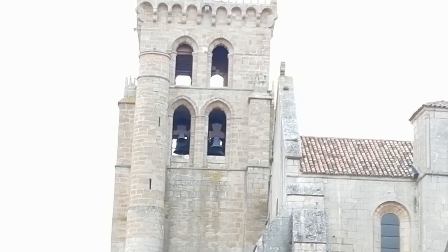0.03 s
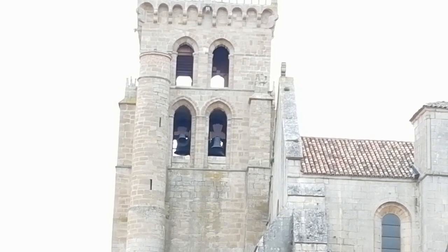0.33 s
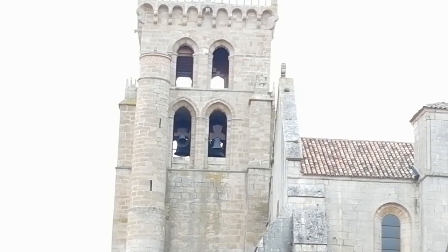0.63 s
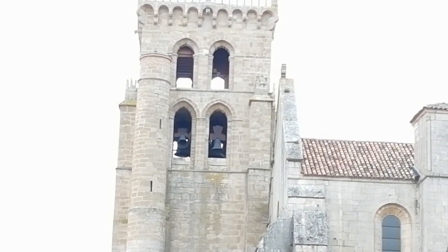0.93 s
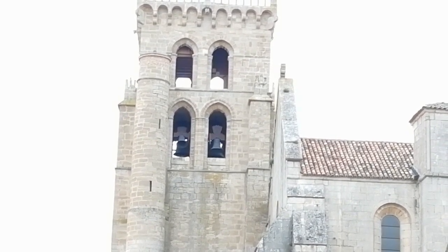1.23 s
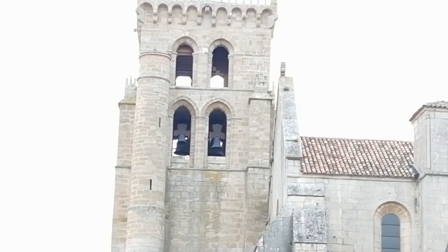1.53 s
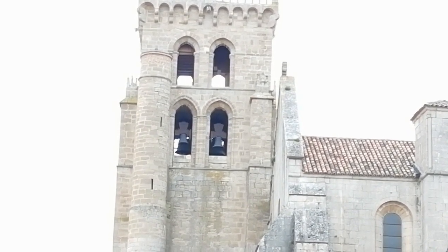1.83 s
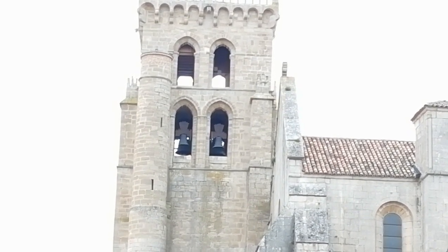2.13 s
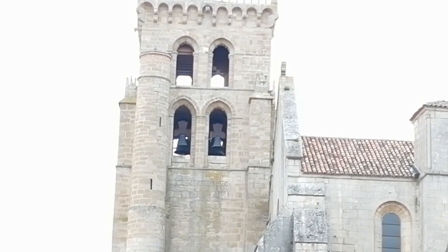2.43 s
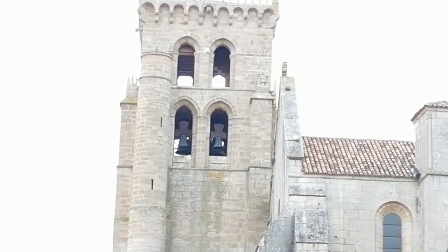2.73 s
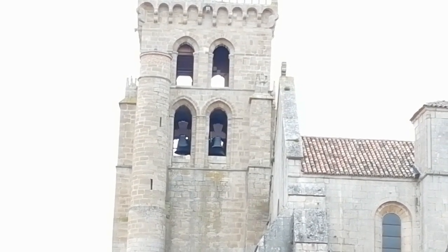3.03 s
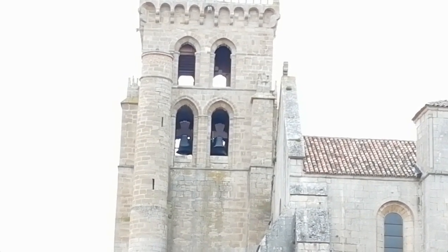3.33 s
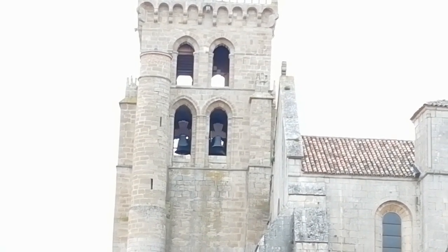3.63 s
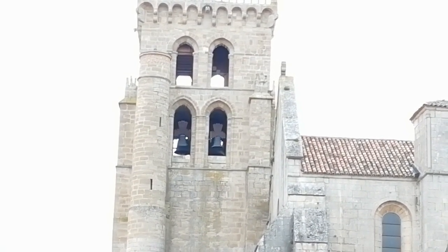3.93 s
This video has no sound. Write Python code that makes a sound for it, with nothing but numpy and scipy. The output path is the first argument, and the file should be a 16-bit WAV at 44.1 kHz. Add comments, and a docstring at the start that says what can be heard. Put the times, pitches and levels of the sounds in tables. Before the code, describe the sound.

A church bell clangs hard right at the start and again at 0.5 seconds, echoing off courtyard walls. Its metallic tones pulse and swell, fading by about 3 seconds. A small bird chirps at 2.5 seconds, with fainter chirps and thin whistles after 3. Wind rumbles on the microphone from about 2.9 seconds to the end. A soft, duller bell stroke comes at 3.8 seconds, over faint outdoor hiss.

```python
"""In a court below a stone tower, a swinging church bell rings: two hard blows, a pause, a soft one.
Each blow of the clapper makes a short clang and many ringing tones, which pulse and swell as the
bell's mouth turns. The walls throw each blow back twice. Small birds chirp and whistle, a gust of
wind rumbles on the microphone, and one tiny tick sounds over a faint outdoor hiss."""
import sys
import numpy as np
from scipy import signal
from scipy.fft import rfft, irfft
from scipy.io import wavfile

SR = 44100
rng = np.random.default_rng(int(sys.argv[2]) if len(sys.argv) > 2 else 0)


def store_wav(level_fs):
    """Save 16-bit WAV to argv[1]."""
    pcm = np.round(np.clip(np.atleast_2d(level_fs), -1, 1) * 32767)
    wavfile.write(sys.argv[1], SR, pcm.T.astype(np.int16))


N = 176400

# Clapper blows. Each row: start in seconds, spot struck on the lip (0, 1 or 2), clang gain in dB,
# clang treble cut-off in Hz, extra gain of the clang's echoes in dB.
BLOWS = [(-.02, 0, -29.5, 11000, -7), (.489, 1, -30.5, 8000, 0), (3.766, 2, -46, 2200, -7)]
# Wall echoes. Each row: delay in seconds, gain for the ring in dB, gain for the clang in dB.
WALL_ECHOES = [(.19, 0, -4), (.375, -7, -10)]
# The tone colour of iron hitting bronze. Each row: frequency in Hz, relative level in dB.
CLANG_COLOUR = [(300, -20), (600, -12), (1000, -2), (1600, 0), (2300, -2.5), (3000, -6.5), (4300, -13),
                (5500, -25), (8000, -29), (11000, -42)]


def bell_ring(t):
    """Each blow rings close pairs of tones that beat (pulse); the swing and the walls make them swell."""
    # The bell's tones. Each row: pitch in Hz, seconds to fade by 60 dB, beat rate in Hz, beat depth
    # from 0 to 1, left minus right in dB, then relative levels in dB when struck at spots 0, 1 and 2.
    tones = [(241.6, 11.0, 0.38, 0.75, 0, -64, -70, -82), (393.8, 6.0, 1.18, 0.55, -2, -45.5, -64, -62),
             (559.0, 11.0, 0.38, 0.35, -5, -51, -61, -68), (638.9, 4.5, 0.38, 0.75, -5, -44, -48, -57),
             (946.6, 4.5, 1.42, 0.35, 0, -52, -61, -61), (1007.7, 3.6, 1.58, 0.15, -1, -48, -52, -63),
             (1088.6, 3.0, 0.54, 0.35, -6, -42, -34, -44), (1152.2, 3.0, 2.06, 0.35, -3, -48, -50, -54),
             (1227.1, 3.0, 0.94, 0.55, -6, -40, -52, -57), (1422.9, 2.1, 4.46, 0.15, 0, -48, -48, -58),
             (1595.0, 1.8, 1.26, 0.35, -5.5, -46, -38, -49), (1624.6, 2.1, 0.94, 0.35, 0, -26, -24, -48),
             (1665.2, 2.3, 1.18, 0.15, -1, -28, -30.5, -44), (1943.5, 1.5, 1.02, 0.55, -1, -40, -43, -56.5),
             (2093.5, 1.2, 2.86, 0.15, 1, -43, -37, -62), (2209.2, 1.8, 1.74, 0.15, 7, -43, -38.5, -62),
             (2289, 2.1, 1.18, 0.75, -2.5, -29.5, -38.5, -41.5), (2311, 1.8, 4.46, 0.15, -2, -42, -42, -65),
             (2595.4, 1.2, 1.5, 0.3, -3, -48, -41, -68), (2637.0, 1.5, 0.3, 0.15, -5, -49, -43, -72),
             (2787.7, 1.1, 3.98, 0.15, -4, -33.5, -37.5, -57), (2871.1, 1.3, 0.86, 0.35, -8, -44, -43, -63),
             (2987, 1.8, 1.02, 0.35, -7, -38, -40.5, -53), (3241.3, 1.2, 1.18, 0.75, -16, -37.5, -45, -76),
             (3544.4, 1.8, 1.26, 0.75, -14, -46, -59, -85), (3729.6, 2.0, 1.34, 0.55, -12, -40, -49.5, -63),
             (3939, 1.4, 4.46, 0.15, -16, -44, -45, -69), (4529.4, 1.7, 3.9, 0.35, -9, -48.5, -56, -67)]
    # How much the mouth faces the listener. Each row: time in seconds, gain for high tones in dB.
    facing = [(0, -1), (.13, 2), (.22, 0), (.43, -3.5), (.52, 0), (.9, 1), (1.3, 3.5), (1.7, -3), (2.3, -8),
              (3.8, -3)]
    # Tones that swell and dip on their own, listed by pitch in Hz. Each row: time in seconds, gain in dB.
    swells = {394: [(.1, 0), (.4, 3), (.9, 0), (1.05, -11), (1.24, -9), (1.4, 0)], 639: [(.05, -8),
              (.24, 0), (.62, -3), (.75, 6), (1, 2), (1.17, -6), (1.35, 2), (1.55, -6), (1.9, 5), (3.2, 0)],
              1089: [(.2, 0), (.45, 8), (.51, -4), (.66, 5), (.73, -9), (.8, -3), (.95, -4), (1.09, 4),
              (1.2, -10), (1.3, 5), (1.43, -7), (1.6, 0)], 1625: [(.3, 0), (.52, -2), (.96, 3), (1.08, -3),
              (1.2, 0)], 2289: [(.08, 0), (.25, -1), (.6, 2), (.72, -4), (.87, 6), (1.05, -4), (1.35, 1)]}
    # How far the two ears are out of step. Each row: pitch in Hz, phase gap in radians.
    ear_gaps = [(240, .6), (394, 1.7), (560, 2.35), (640, 1.6), (1100, .8), (1650, .4), (2300, 1.7),
                (4000, 2.0)]
    bell_db, echo_share, beam_hz = -.7, .3, 1600
    late_scatter, fresh_scatter, scatter_s = .21, .38, .35
    out = np.zeros((2, N))
    slow_t = np.linspace(0, t[-1], 4000)  # coarse time steps for the loudness changes
    facing_db = curve(slow_t, facing)
    fresh = sum((slow_t > start) * np.exp(-np.abs(slow_t - start) / scatter_s) for start, *_ in BLOWS)
    for hz, t60, beat_hz, beat_depth, pan_db, *spot_db in tones:
        power = 0
        for start, spot, *_ in BLOWS:
            age = slow_t - start
            echoes = sum(undb(db) * fade(age - delay, t60, rise=.02) for delay, db, _ in WALL_ECHOES)
            ring = fade(age, t60, rise=.008) + echo_share * echoes
            beating = np.abs(1 + beat_depth * np.exp(2j * np.pi * beat_hz * age))
            power += (undb(spot_db[int(spot)]) * ring * beating) ** 2
        swell_db = sum(curve(slow_t, points) for near_hz, points in swells.items() if abs(near_hz - hz) < 20)
        beam = min(hz / beam_hz, 1)  # low tones spread all round, high ones follow the mouth
        loudness = np.sqrt(2 * power) * undb(bell_db + swell_db + facing_db * beam) * stereo(pan_db)
        # Reflections inside the tower roughen each tone, most of all just after a blow.
        scatter = (late_scatter + fresh_scatter * fresh) * np.sqrt(beam)
        half_gap = curve(hz, ear_gaps) * rng.choice([-1, 1]) / 2
        tone = np.exp(2j * np.pi * (hz * t + rng.random()))
        for ear, side in enumerate((1, -1)):
            direct = np.exp(1j * side * half_gap)
            scattered = scatter * wander(slow_t, hz=9)
            envelope = loudness[ear] * (direct + scattered) / np.sqrt(1 + scatter ** 2)
            out[ear] += (np.interp(t, slow_t, envelope) * tone).real
    return out


def clapper_clang(t):
    """Iron cracks against bronze, leaving a short tail in the tower and a shimmer of high tones."""
    shimmer = undb(-7.5) * stereo(pan_db=-6) * high_tones()
    out = np.zeros((2, N))
    for start, _, db, cutoff_hz, walls_db in BLOWS:
        age = t - start
        crack = undb(-1.5) * echoing_fade(age, walls_db, t60=.25)
        tail = undb(-12.5) * echoing_fade(age, walls_db, t60=1.35)
        hit = np.hypot(crack, tail) * wide_noise(CLANG_COLOUR, side_db=0) * stereo(pan_db=-2)
        ringing = shimmer * echoing_fade(age, walls_db, t60=1.45)
        treble_cut = signal.butter(2, cutoff_hz, fs=SR, output="sos")
        out += undb(db) * signal.sosfilt(treble_cut, hit + ringing)
    return out


def high_tones():
    """The bell's many weak high tones: narrow, wavering peaks in noise."""
    count, low_hz, high_hz, width_hz, db_per_octave = 70, 2100, 9500, 2.5, 5.5
    freqs = np.fft.rfftfreq(N, 1 / SR)
    peaks = 0
    for k, (place, size) in enumerate(rng.random((count, 2))):
        hz = low_hz * (high_hz / low_hz) ** ((k + place) / count)
        height = undb(10 * size + db_per_octave * np.log2(hz / low_hz))
        peaks += height / (1 + ((freqs - hz) / width_hz) ** 2)
    return np.array([noise(CLANG_COLOUR, peaks) for _ in range(2)])


def echoing_fade(age, walls_db, t60):
    """The loudness of a clang over time: it arrives directly, then twice more off the walls."""
    power = fade(age, t60, rise=.006) ** 2
    for delay, _, db in WALL_ECHOES:
        power += (undb(db + walls_db) * fade(age - delay, t60, rise=.02)) ** 2
    return np.sqrt(power)


def wind(t):
    """Swirls of air rumble on the microphone; a stronger gust reaches higher in pitch."""
    # The wind's strength. Each row: time in seconds, level in dB before the flutter is added.
    gust = [(0, -54), (.07, -45), (.16, -59), (.45, -52), (.65, -45), (1.08, -56), (1.5, -55.5),
            (1.95, -63.5), (2.16, -51), (2.6, -52.5), (2.76, -46.5), (2.9, -36.5), (3.07, -31.5),
            (3.14, -35.5), (3.22, -31.5), (3.28, -37.5), (3.6, -35), (3.68, -41), (3.77, -31.5), (4, -31.5)]
    # The tone colours of light and strong wind. Each row: frequency in Hz, relative level in dB.
    light_colour = [(15, -2), (40, 1.5), (80, -0.5), (130, -11.5), (220, -25), (400, -34.5), (800, -60.5)]
    strong_colour = [(15, -9), (40, -4), (80, 0), (140, -1), (220, -8.5), (300, -16.5), (420, -29),
                     (600, -57.5), (1200, -71)]
    light_db, strong_db, flutter_db, lag_s = -54.5, -37, 3.5, .0009
    db = curve(t, gust)
    strength = np.clip((db - light_db) / (strong_db - light_db), 0, 1)
    light = np.sqrt(1 - strength) * wide_noise(light_colour, side_db=-18)
    strong = np.sqrt(strength) * wide_noise(strong_colour, side_db=-18)
    left, right = (light + strong) * undb(db + flutter_db * wander(t, hz=10).real)
    return np.array([left, np.interp(t - lag_s, t, right)])  # the swirls reach the left ear first


def bird_chirps(t):
    """One bird on the right gives quick falling chirps that echo briefly in the court."""
    # Each row: start in seconds, relative level in dB.
    chirps = [(2.503, -50), (3.174, -67), (3.243, -65), (3.313, -63), (3.387, -65), (3.469, -64),
              (3.565, -67)]
    from_hz, to_hz, length_s, echo_db = 4250, 2950, .03, -9
    out = np.zeros((2, N))
    for start, db in chirps:
        progress = np.clip((t - start) / length_s, 0, 1)
        hz = from_hz * (to_hz / from_hz) ** progress * (1 + .015 * wander(t, hz=150).real)
        tone = np.sin(2 * np.pi * np.cumsum(hz) / SR)
        out += undb(db) * stereo(pan_db=-9) * np.sin(np.pi * progress) * tone
    court = rng.standard_normal((2, N)) * fade(t, t60=.4, rise=.02)
    echo = signal.fftconvolve(out, court / np.linalg.norm(court[0]), axes=1)[:, :N]
    return out + undb(echo_db) * echo


def bird_whistles(t):
    """Far birds give thin, slightly rising whistles that flicker in each ear."""
    # Each row: start in seconds, length in seconds, pitch it rises to in Hz, relative level in dB.
    whistles = [(1.61, .15, 5370, -65), (3.48, .12, 7720, -63), (3.69, .21, 6120, -63)]
    rise, waver = .04, .006  # shares of the pitch
    out = np.zeros((2, N))
    for start, length, pitch_hz, db in whistles:
        progress = np.clip((t - start) / length, 0, 1)
        hz = pitch_hz * (1 - rise * (1 - progress) ** 4 + waver * wander(t, hz=40).real)
        tone = undb(db) * np.sin(np.pi * progress) * np.exp(2j * np.pi * np.cumsum(hz) / SR)
        out += np.array([(tone * wander(t, hz=25)).real for _ in range(2)])
    return out


def tick(t):
    """One tiny burst of high noise, close by."""
    start_s, hz = 2.856, 9500
    colour = [(hz / 2, -20), (hz, 0), (hz * 1.5, -18)]
    return undb(-54) * fade(t - start_s, t60=.015, rise=.0005) * wide_noise(colour, side_db=-5)


def outdoor_hiss():
    """A faint, steady hiss from all around."""
    # Each row: frequency in Hz, relative level in dB.
    colour = [(100, 7.5), (400, -1), (3000, -3.5), (5500, -7), (8300, -5), (10500, -15.5), (15500, -19.5)]
    return undb(-64.5) * wide_noise(colour, side_db=0)


def undb(db):
    """Turns decibels into a gain to multiply by."""
    return 10 ** (np.asarray(db) / 20)


def curve(x, points):
    """Joins the points with straight lines and reads the value at x."""
    return np.interp(x, *np.array(points, float).T)


def stereo(pan_db):
    """Left and right gains with a constant total power; positive pan_db is to the left."""
    gains = undb(np.array([[pan_db], [-pan_db]]) / 2)
    return gains / np.sqrt(np.mean(gains ** 2))


def noise(colour, peaks=1):
    """Noise of typical size 1, shaped by (Hz, dB) points and optional ringing peaks."""
    hz, db = np.array(colour, float).T
    freqs = np.maximum(np.fft.rfftfreq(N, 1 / SR), 1)
    gains = undb(np.interp(np.log(freqs), np.log(hz), db))
    shaped = irfft(rfft(rng.standard_normal(N)) * peaks * gains, N)
    return shaped / shaped.std()


def wide_noise(colour, side_db):
    """Shaped noise in stereo; side_db sets the part that differs between the ears."""
    return noise(colour) + undb(side_db) * noise(colour) * np.array([[1], [-1]])


def wander(t, hz):
    """A smooth random wobble of typical size 1, mostly slower than hz, as complex numbers."""
    count = 4096
    freqs = np.fft.fftfreq(count, N / SR / count)
    spectrum = rng.standard_normal(count) + 1j * rng.standard_normal(count)
    wobble = np.fft.ifft(spectrum / (1 + (freqs / hz) ** 2) ** .75)
    return np.interp(t, np.linspace(0, N / SR, count), wobble / wobble.std())


def fade(age, t60, rise):
    """Grows for rise seconds and dies away by 60 dB every t60 seconds."""
    return np.clip(age / rise, 0, 1) * np.exp(-np.log(1000) * np.maximum(age, 0) / t60)


def scene():
    """Adds up everything heard in the court."""
    t = np.arange(N) / SR
    bell = bell_ring(t) + clapper_clang(t)
    birds = bird_chirps(t) + bird_whistles(t)
    return bell + birds + wind(t) + tick(t) + outdoor_hiss()


def record(dry):
    """A steep filter cuts off the highest treble."""
    top_hz = 15700
    return signal.sosfilt(signal.ellip(8, .2, 70, top_hz, fs=SR, output="sos"), dry)


dry = scene()
out = record(dry)
store_wav(out)
```